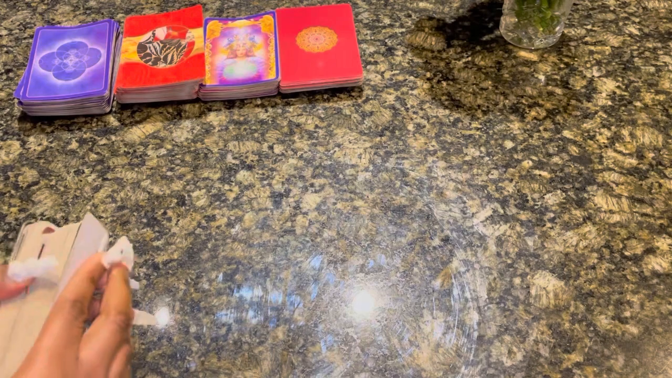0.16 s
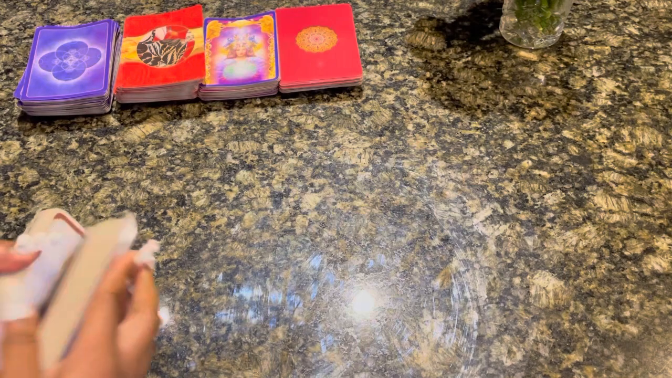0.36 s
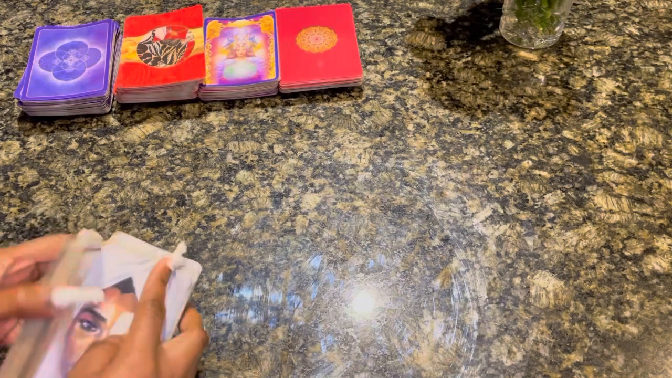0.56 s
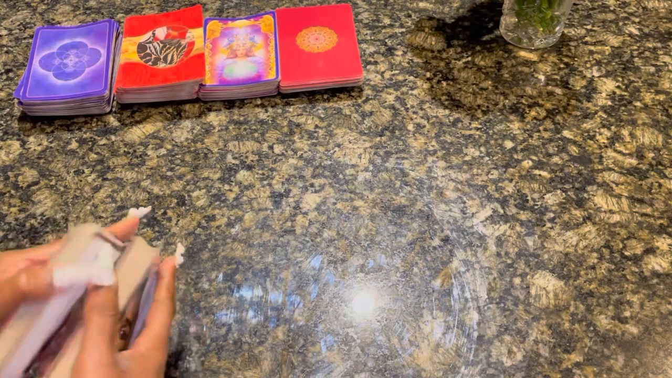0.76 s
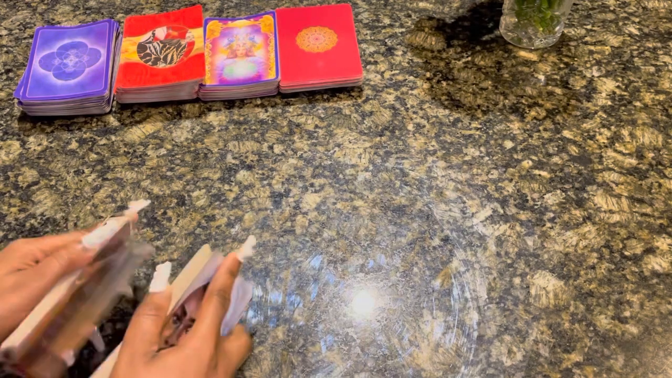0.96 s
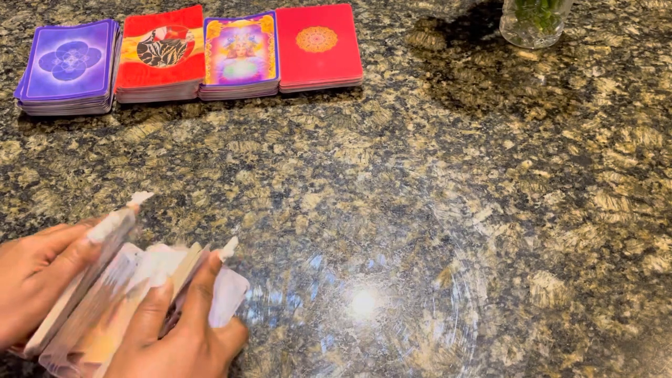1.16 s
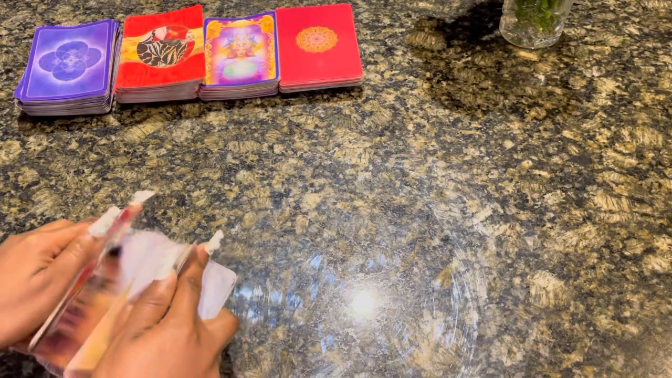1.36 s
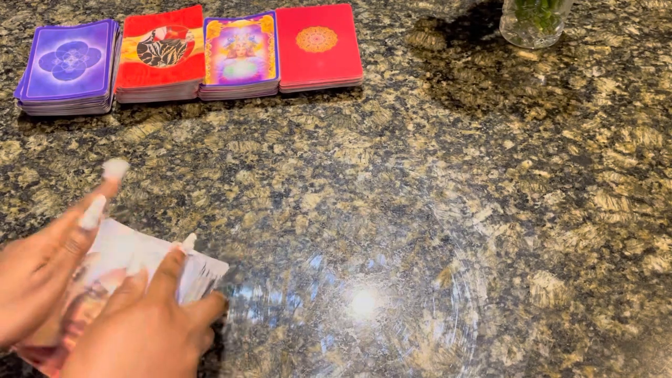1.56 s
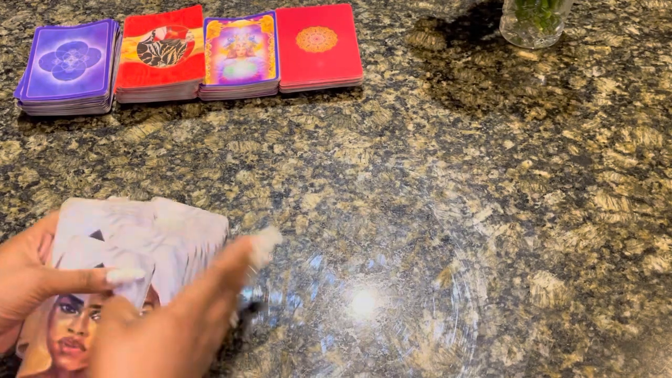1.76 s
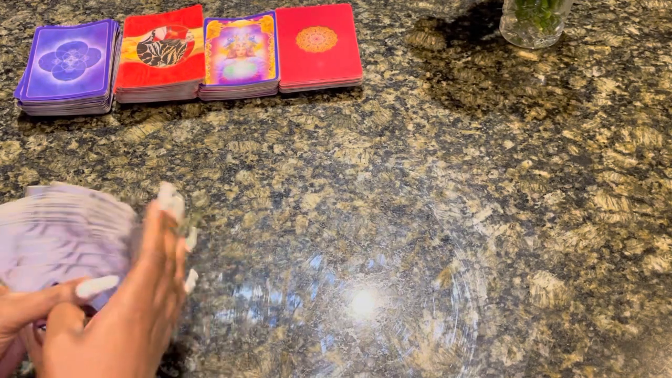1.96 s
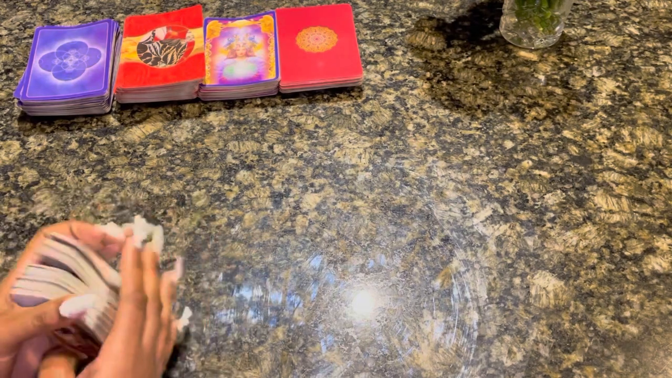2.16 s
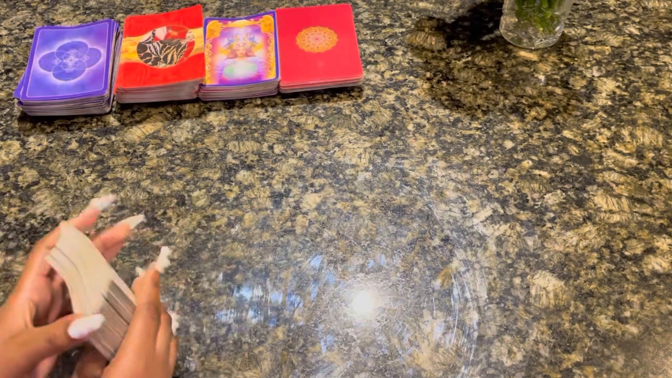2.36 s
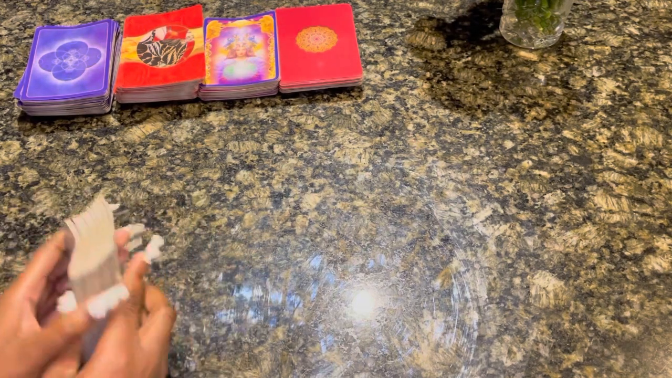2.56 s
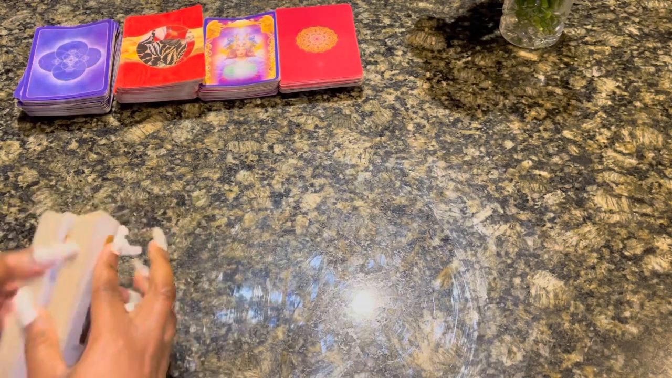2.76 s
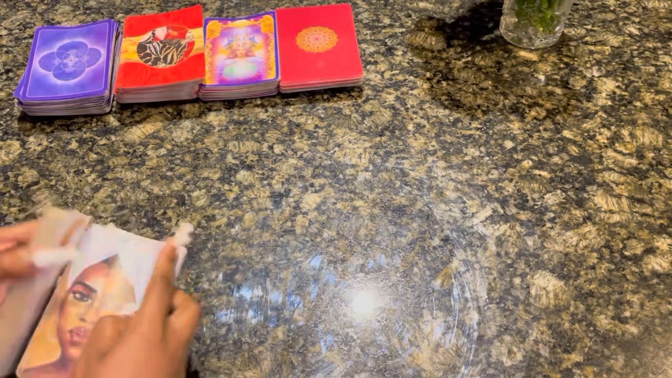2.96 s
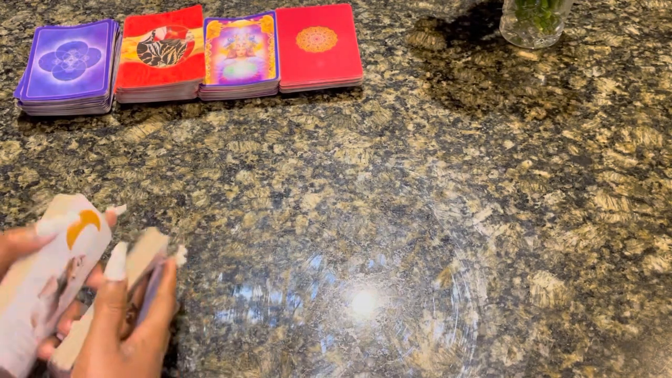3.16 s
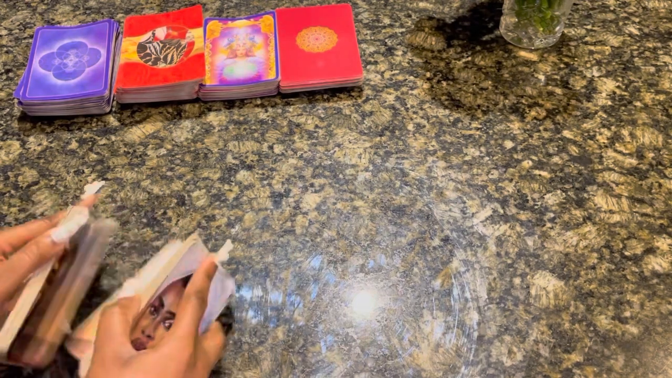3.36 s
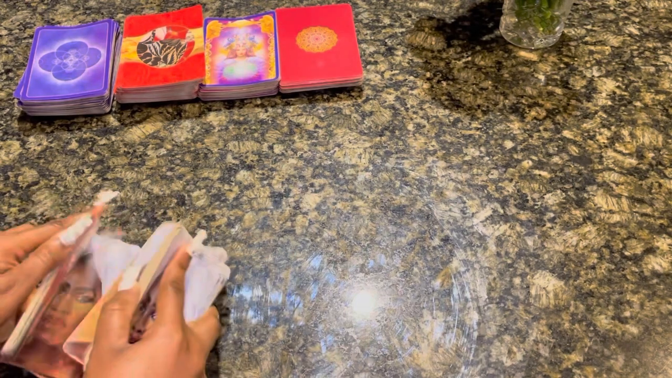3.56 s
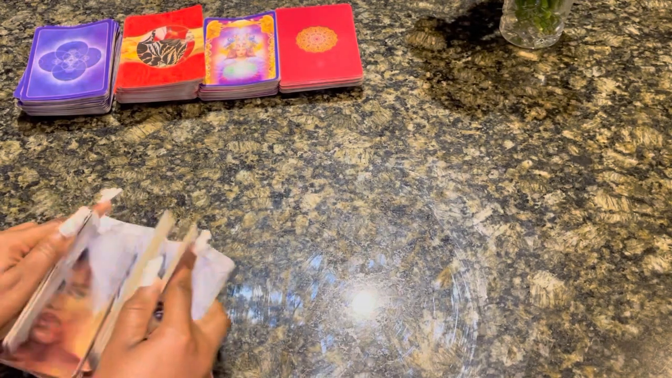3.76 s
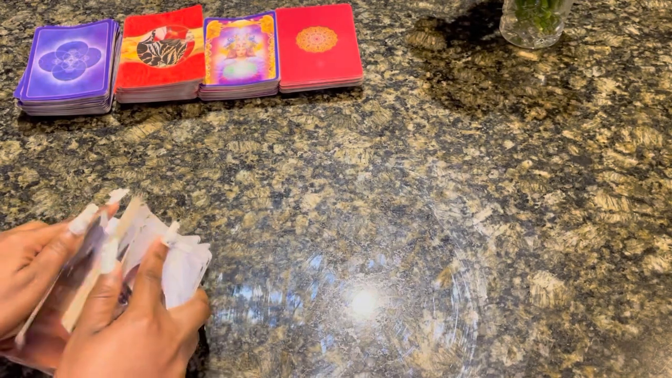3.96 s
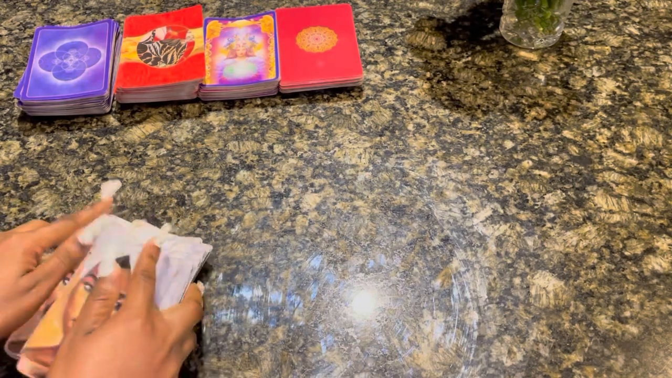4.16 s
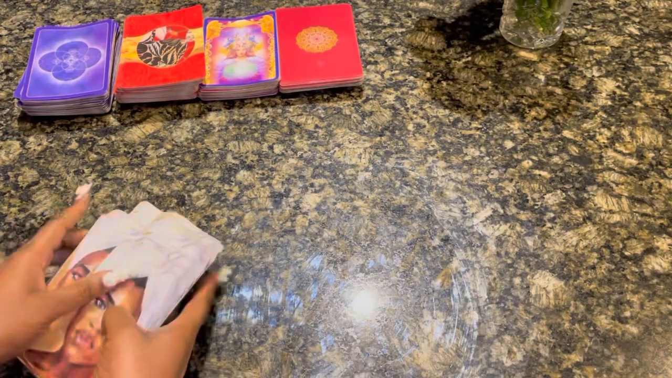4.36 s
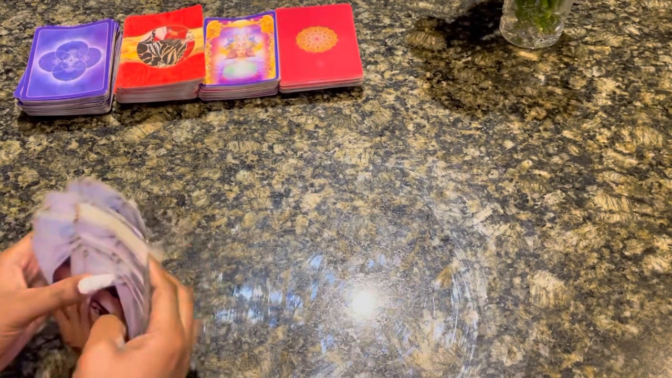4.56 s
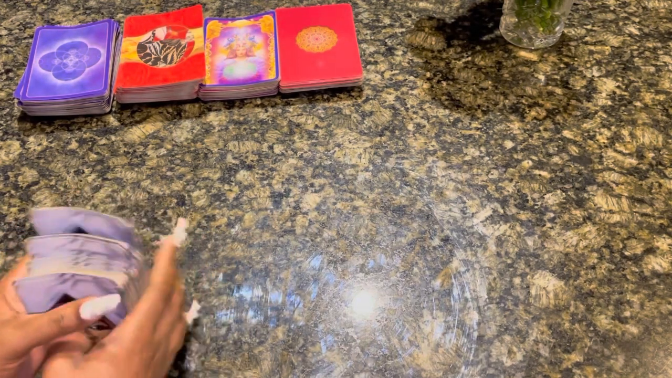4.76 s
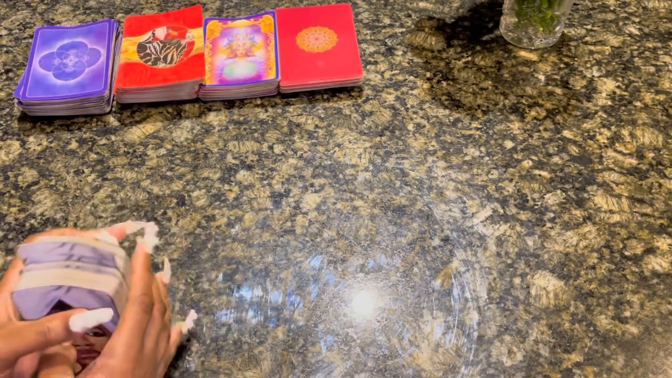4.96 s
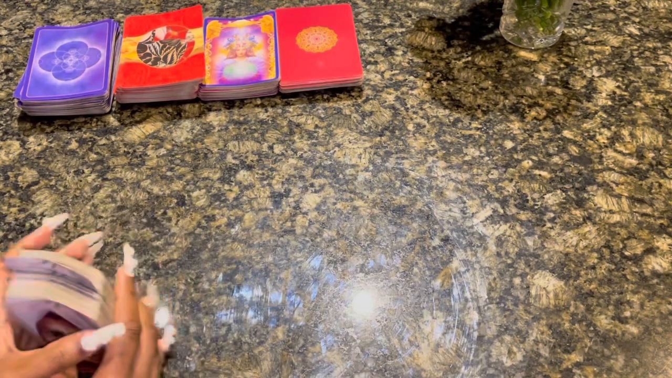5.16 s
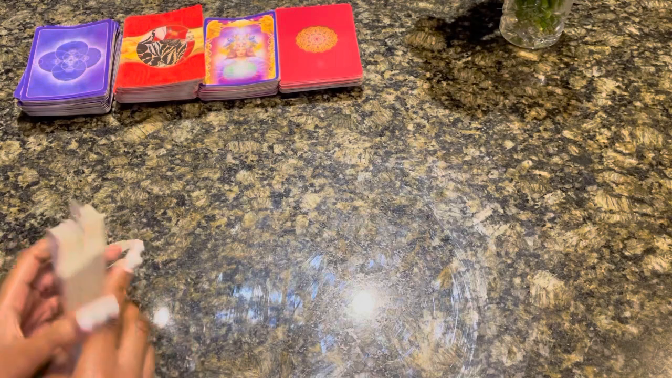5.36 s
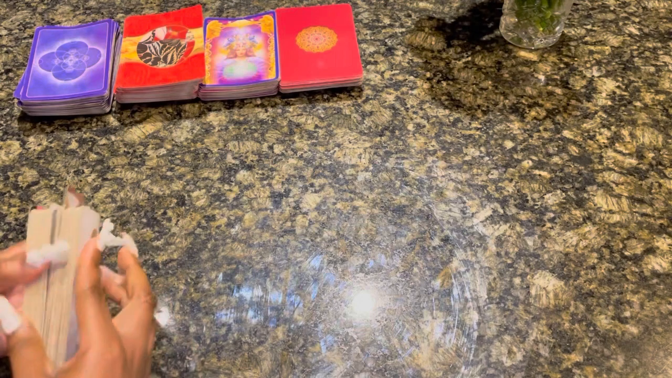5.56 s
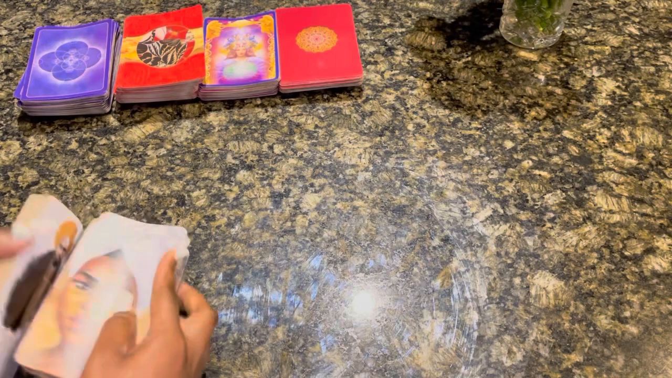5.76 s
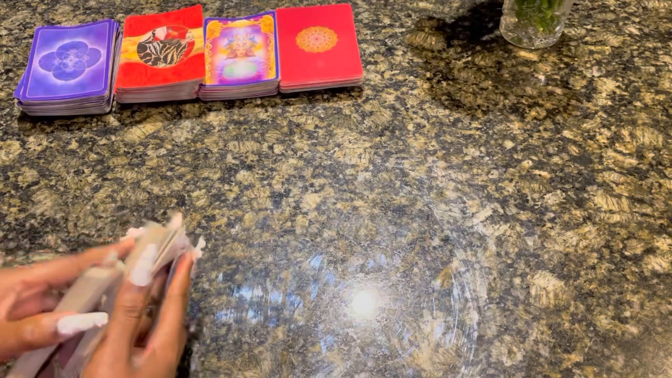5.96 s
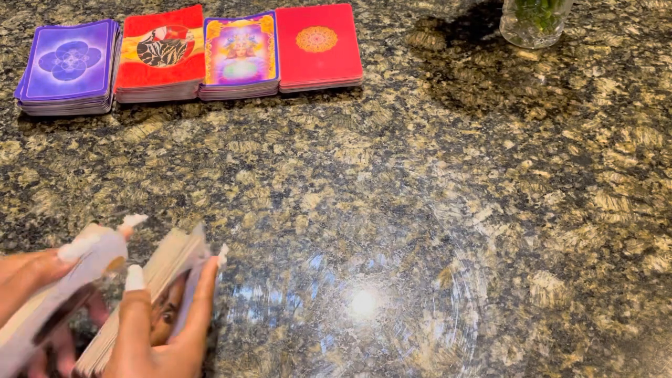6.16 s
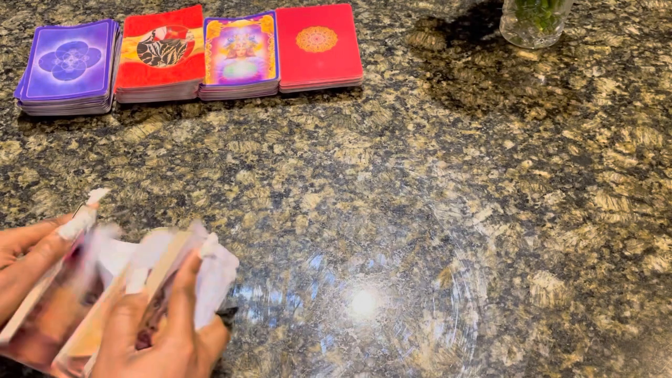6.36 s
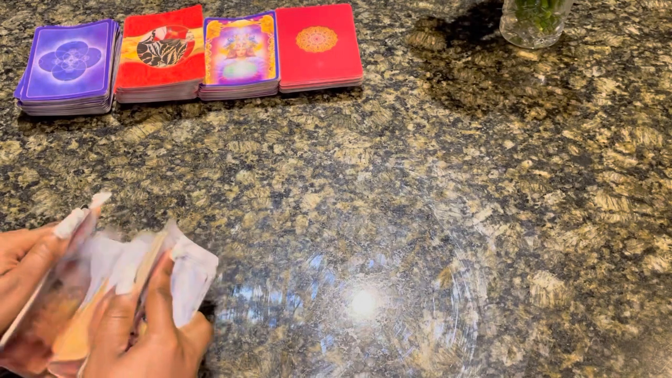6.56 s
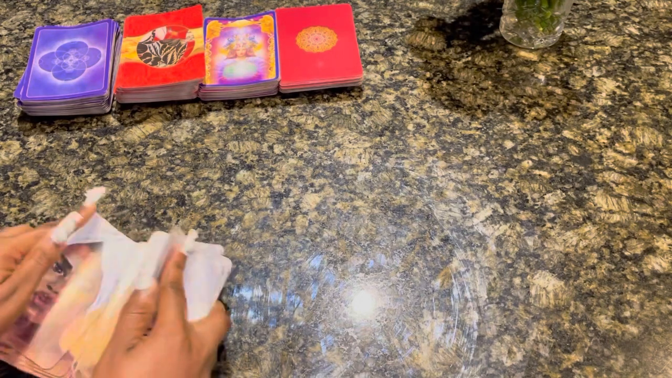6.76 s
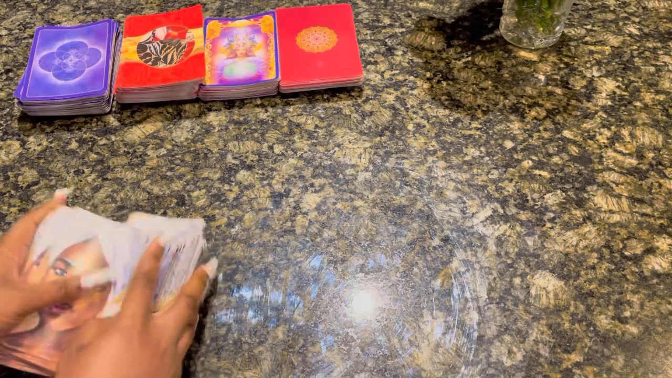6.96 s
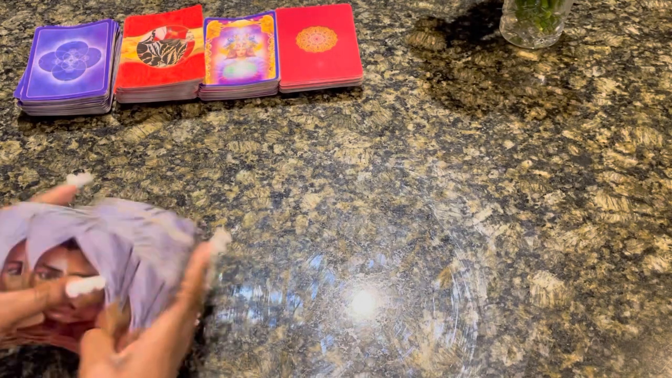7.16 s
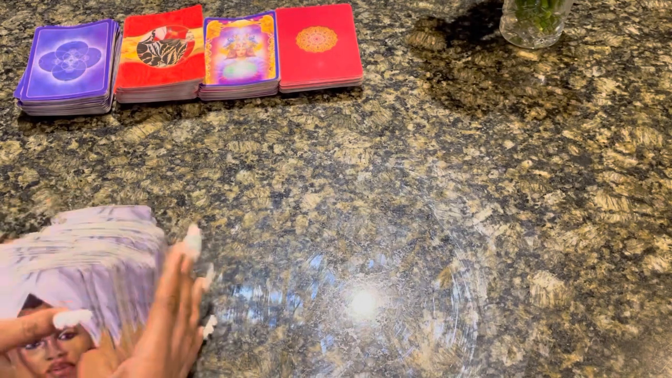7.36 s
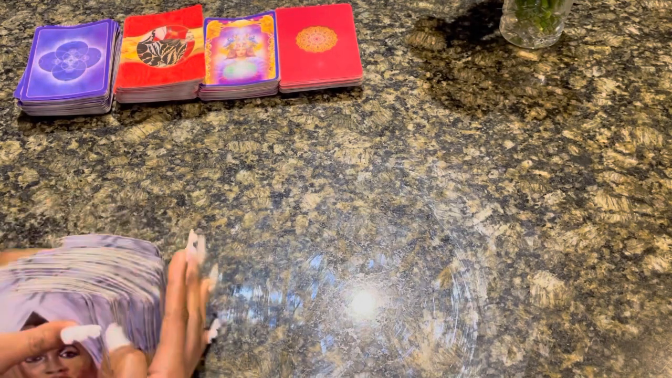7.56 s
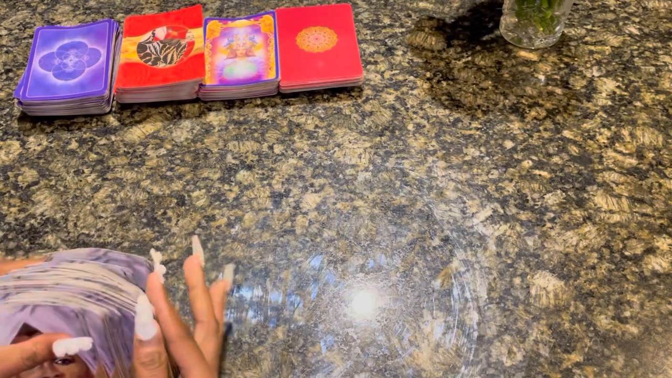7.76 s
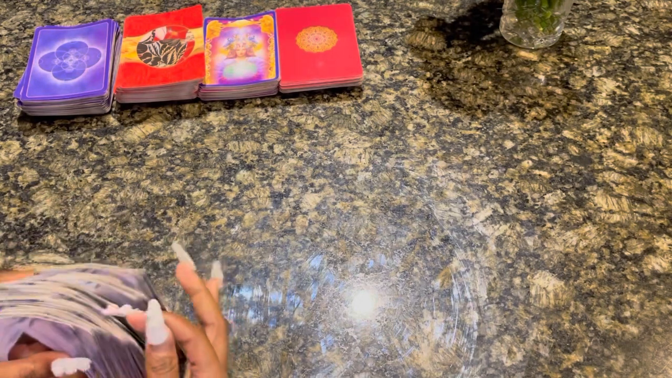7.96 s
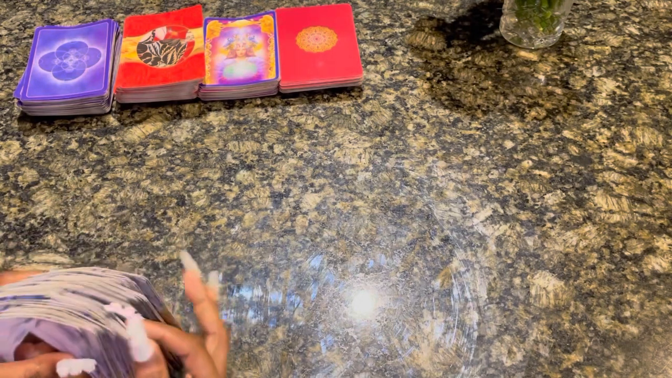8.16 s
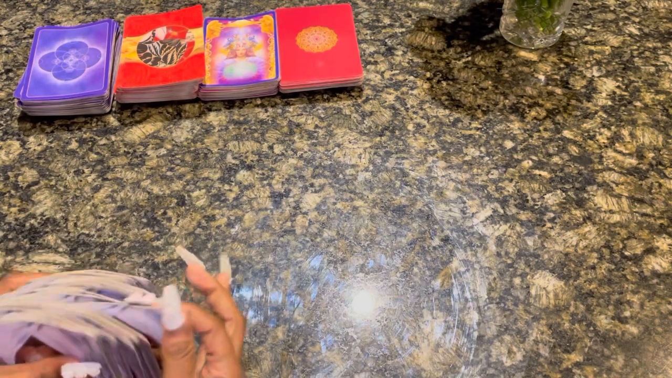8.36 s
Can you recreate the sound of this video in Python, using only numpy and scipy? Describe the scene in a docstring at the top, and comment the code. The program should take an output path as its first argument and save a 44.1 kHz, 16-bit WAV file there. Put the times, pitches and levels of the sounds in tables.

```python
"""Shuffling stiff cards

A deck is shuffled by hand on a stone counter in a bare, echoing room, close to a microphone.
Card edges snap past the thumbs: a burst of noise for the crack, short resonances for the bending card.
Whole packets slap flat, faces rub with ticking noise, and the deck's edge rings as it knocks the stone.
Fingers pat softly. A mains motor hums behind, made of sines, over room air and microphone hiss.
Fading noise makes the echo; the hardest snaps overload the microphone."""
import sys
import numpy as np
from scipy import signal
from scipy.fft import rfft, irfft, next_fast_len
from scipy.io import wavfile
from scipy.ndimage import map_coordinates

SR = 44100
rng = np.random.default_rng(int(sys.argv[2]) if len(sys.argv) > 2 else 0)


def generate_wav(signal):
    """Clip the signal to [-1, 1] and save it as 16-bit WAV at the path in sys.argv[1]."""
    frames = np.transpose(np.atleast_2d(signal))
    scaled = np.clip(frames, -1, 1) * 32767
    pcm = np.round(scaled).astype(np.int16)
    wavfile.write(sys.argv[1], SR, pcm)


N = 370881  # length in samples
LEAD = SR  # samples before time zero, so that earlier sounds still echo

# card edges let go: (t/s, crack peak level/dB, flexing rms level/dB, flexing pitch f/Hz)
EDGE_SNAPS = [(0.4765, -29.5, -40.5, 1570), (0.5075, -18.5, -44, 1400), (0.5417, -27, -49, 2080),
              (0.6559, -28.5, -35.5, 1850), (1.0547, -16.5, -30.5, 1680), (1.0639, -20.5, -27, 1650),
              (1.0941, -10, -35, 1530), (1.1568, -13, -36, 1840), (1.2249, -21.5, -20.5, 1400),
              (1.2467, -16.5, -25.5, 1460), (1.2628, -7, -19.5, 1470), (1.3547, -12.5, -22.5, 1840),
              (1.3675, -9.5, -25, 1430), (1.376, -12.5, -21, 1660), (1.3995, -8.5, -34.5, 1240),
              (1.4512, -8.5, -12.5, 1550), (1.5039, -8, -25.5, 1960), (1.5298, -23, -24, 1900),
              (1.6361, -10, -34, 1780), (1.7268, -7, -36, 1760), (2.0952, -9, -20, 1770),
              (2.1365, -21, -31.5, 1770), (2.9216, -28, -38, 1370), (3.4078, -16.5, -28, 1690),
              (3.488, -22, -38.5, 1670), (3.5213, -20.5, -40, 1610), (3.5447, -20.5, -34.5, 1510),
              (3.6167, -24, -26.5, 1760), (3.6391, -15, -27, 1490), (3.6879, -24, -30.5, 1450),
              (3.9885, -15.5, -36, 1730), (4.3008, -13.5, -31.5, 1250), (4.4149, -22.5, -30.5, 1372),
              (4.557, -25.5, -37.5, 1440), (4.8535, -35, -29, 1858), (4.8903, -32, -29, 1130),
              (4.9006, -36.5, -27, 1780), (5.679, -33, -37.5, 1920), (5.745, -19.5, -51, 1400),
              (5.7662, -21, -40.5, 1280), (5.916, -25, -36.5, 1460), (6.3216, -24, -35, 1290),
              (6.3685, -22.5, -38, 1540), (6.4531, -17, -26.5, 1500), (6.4811, -10.5, -28, 1440),
              (6.542, -16, -28.5, 1360), (6.5463, -11.5, -32.5, 1590), (6.577, -2, -22.5, 1490),
              (6.5847, -7, -25.5, 1460), (6.6071, -12.5, -21, 1690), (6.6743, -13, -24, 1360),
              (6.6891, -9.5, -26, 1590), (6.6954, -11, -32.5, 2000), (6.7103, -15, -21.5, 1640),
              (6.794, -30, -48, 1600), (6.8626, -17, -35.5, 1610), (6.9787, -28, -36.5, 1850),
              (6.998, -20, -38, 1390), (7.2703, -30.5, -42, 1340), (7.2807, -33, -27.5, 1390),
              (7.2985, -27, -29, 1250), (7.3133, -17, -26.5, 1290), (7.3324, -32, -33.5, 1200),
              (8.1703, -42, -39.5, 1180)]
# whole packets slap flat, the first before the start: the same columns, then (lift of the other modes level/dB)
PACKET_SLAPS = [(-.3, 5.8, -15.5, 1480, 6.5), (1.4845, 10.7, -11.5, 1805, -14.5), (4.0477, 12, -7, 1230, 4)]
# modes of one bent card: (multiple of the pitch, width as share of the pitch, level/dB)
CARD_MODES = [(1, 0.37, 11), (1.702, 0.63, 0)]
# modes of a thick packet: (multiple of the pitch, width as share of the pitch, level/dB)
PACKET_MODES = [(.72, 0.28, -7), (1, 0.13, 6), (1.65, 0.61, -4.5), (3.25, 0.061, 0.5), (4.898, 0.18, -15)]
# tone of a crack before thinning: (f/Hz, relative level/dB)
CRACK_TONE = [(1500, -17), (3000, 0), (4000, -2), (6200, 0.5), (7400, -4), (9000, 2), (11300, 0.5),
              (13000, -7), (15500, -39)]
# the deck's edge meets the counter: (t/s, approximate peak level/dB)
DECK_KNOCKS = [(2.095, -8.5), (2.117, -18.5), (2.139, -26), (2.158, -17), (4.648, -23.5), (4.829, -22),
               (4.853, -23.5), (4.890, -20.5), (4.91, -16), (7.298, -27), (7.313, -20.5)]
# modes of the deck on stone: (f/Hz, width f/Hz, relative level/dB)
DECK_MODES = [(420, 79, -4), (600, 16, 3.5), (767, 12, -21.5), (1065, 32, 16), (1700, 60, 10.5),
              (2550, 240, -3.5), (4630, 2800, -4)]
# fingers pat the pack or the stone: (t/s, f/Hz, peak level/dB of the swell)
FINGER_PATS = [(.73, 600, -31.5), (1.009, 231, -37.5), (2.924, 760, -32)]
# faces rub past each other: (middle t/s, nominal length t/s, hiss level/dB, body of the pack level/dB)
RUBBING_STROKES = [(0.505, 0.086, -43, -49), (0.654, 0.084, -44, -46.5), (0.732, 0.09, -48.5, -49),
                   (.88, 0.01, -48.5, -45.5), (1.178, 0.33, -47, -39), (1.27, 0.03, -33.5, -36),
                   (1.384, 0.058, -34, -25.5), (1.924, 0.079, -36.5, -43), (2.128, 0.083, -54, -28.5),
                   (2.883, 0.11, -42.5, -49), (3.107, 0.044, -47, -50), (3.501, 0.2, -47, -45.5),
                   (3.624, 0.089, -36.5, -33), (3.733, 0.081, -35.5, -37), (3.852, 0.083, -50, -44),
                   (4.643, 0.075, -42.5, -36), (4.761, 0.093, -47, -45.5), (4.926, 0.12, -60.5, -47),
                   (5.668, 0.013, -42, -37.5), (5.76, 0.086, -43, -56), (5.84, 0.44, -56.5, -64),
                   (6.201, 0.032, -38, -61), (6.492, 0.3, -42.5, -41), (6.586, 0.072, -36, -31),
                   (6.696, .05, -26, -24.5), (6.835, 0.16, -40.5, -41.5), (7.151, .2, -55, -50.5),
                   (7.316, 0.021, -31.5, -27.5), (8.331, .048, -69, -50)]
# tone of the rubbing edges: (f/Hz, relative level/dB per Hz)
RUB_HISS_TONE = [(2000, -27.5), (4000, -1), (5800, 3), (7400, 1.5), (9500, 9), (11300, 4), (13000, 0),
                 (15500, -10.5)]
# tone of the rubbing pack: (f/Hz, relative level/dB per Hz)
RUB_PACK_TONE = [(300, -7), (700, 4.5), (1500, 2), (2300, 2.5), (3300, -6), (6000, -19)]
# echo of the hard walls: (f/Hz, time to fall 60 dB t/s)
WALL_DECAY = [(300, 2.16), (800, 2.03), (2000, 1.414), (5500, 1.41), (10000, 0.66), (15000, 1.06)]
# motor hum: (f/Hz, average rms level/dB)
MOTOR_HUM = [(120, -51.5), (240, -69.5)]
# tone of room air and microphone hiss: (f/Hz, relative level/dB per Hz)
AIR_TONE = [(20, -7.5), (70, -5.5), (190, -14.5), (240, -12.5), (300, -13.5), (1000, -14.5), (3200, -26),
            (9800, -32), (15500, -29.5)]

CREEP_S, RELEASE_S = .004, .005  # the edge creeps before it lets go; the release then falls 60 dB
CARD_SCUFF_S, PACKET_SCUFF_S = 0.019, 0.013  # 60 dB fall of the scuff after a usual crack
SCUFF_DB_PER_DOUBLING, SCUFF_SCATTER = 10.5, .3  # duller snaps drag on longer; scatter in doublings
FLEX_S = .005  # the flexing level is the rms over this time
USUAL_CRACK_DB = 14  # peak of a usual crack over its flexing
# dB lost per octave under this frequency, per dB that a crack stands above the usual
THINNING, THIN_BELOW_HZ = 0.21, 8000
CONTACT_S = .00005  # rise of the knock's push
# slips of the rubbing faces: rate, least size, average extra size, fade to 1/e
TICKS_PER_S, TICK_DB, TICK_SPREAD_DB, TICK_S = 300, 3, 2.5, .0007
TOP_HZ = 15750  # band limit


def amp(db):
    """Turn a level in dB into a gain."""
    return 10 ** (np.asarray(db) / 20)


def unit(x):
    """Scale x to rms 1."""
    return x / np.sqrt(np.mean(x ** 2) + 1e-20)


def along(points, hz):
    """Read a curve through (Hz, value) points on a log frequency axis."""
    f, value = np.transpose(points)
    return np.interp(np.log(hz + 1), np.log(f + 1), value)


def wobble(rate):
    """Draw a smooth random curve with rate knots a second."""
    knots = rng.standard_normal(int(N * rate / SR) + 4)
    return map_coordinates(knots, [np.arange(N) * rate / SR])


def filtered(x, response):
    """Multiply the spectrum of x by a response, a function of frequency."""
    m = next_fast_len(len(x) + 8192)
    return irfft(rfft(x, m) * response(np.fft.rfftfreq(m, 1 / SR)), m)[:len(x)]


def coloured_noise(rough, tone):
    """Give noise a tone and rms 1; rough is its moment-to-moment strength."""
    noise = rough * rng.standard_normal(N)
    return unit(filtered(noise, lambda hz: amp(along(tone, hz))))


def causal(points):
    """Minimum-phase response through (Hz, dB) points: nothing sounds before the blow."""
    def response(hz):
        cepstrum = irfft(np.log(amp(along(points, hz))))
        # fold the second half onto the first
        cepstrum[1:len(cepstrum) // 2] *= 2
        cepstrum[len(cepstrum) // 2 + 1:] = 0
        return np.exp(rfft(cepstrum))
    return response


def resonance(hz, centre_hz, width_hz):
    """One damped mode, with gain 1 at its centre."""
    return 1j * hz * width_hz / (centre_hz ** 2 - hz ** 2 + 1j * hz * width_hz)


def mode_sum(modes):
    """Add (Hz, width Hz, dB) modes with alternating signs, as one response."""
    def response(hz):
        return sum((-1) ** k * amp(db) * resonance(hz, centre, width)
                   for k, (centre, width, db) in enumerate(modes))
    return response


def snaps(rows, modes, scuff_s, crack_spread):
    """Each edge cracks raggedly and the bent card rings briefly: (near sound, sound sent to the walls)."""
    near, far = np.zeros((2, LEAD + N + SR))
    t = np.arange(SR // 20) / SR
    pulse = 1. * (t == 0)
    after = np.maximum(t - CREEP_S, 0)
    for s, crack_db, flex_db, pitch_hz, *lift_db in rows:
        excess_db = crack_db - flex_db - USUAL_CRACK_DB
        doublings = -excess_db / SCUFF_DB_PER_DOUBLING + SCUFF_SCATTER * rng.standard_normal()
        drag = 2 ** np.clip(doublings, -2, 2)

        thin_db = THINNING * np.clip(excess_db, -8, 20)
        tone = [(f, db + thin_db * min(np.log2(f / THIN_BELOW_HZ), 0)) for f, db in CRACK_TONE]
        edge = filtered(pulse, causal(tone))
        body = mode_sum([(m * pitch_hz, w * pitch_hz, db + sum(lift_db) * (m != 1))
                         for m, w, db in modes])

        release = amp(-60 * after / RELEASE_S)
        scuff = 1.23 * amp(-60 * after / (scuff_s * drag))
        # the scuff stutters about each millisecond
        slips = amp(4 * np.repeat(rng.standard_normal(len(t) // 40 + 1), 40)[:len(t)])
        strength = np.where(t < CREEP_S, 0.021 * t / CREEP_S, release + slips * scuff)
        burst = strength * rng.standard_normal((2, len(t)))

        crack = signal.fftconvolve(burst[0], edge)[:len(t)]
        crack = amp(crack_db) * crack / np.abs(crack).max()
        flex = filtered(burst[1], body)
        flex = amp(flex_db) * flex * np.sqrt(FLEX_S * SR) / np.linalg.norm(flex)

        at = LEAD + round((s - CREEP_S) * SR)
        near[at:at + len(t)] += crack + flex
        let_go = at + round(CREEP_S * SR)
        # the walls hear all directions at once: ripples average out,
        # and the crack beams more narrowly than the flexing
        for sound, even, spread in ((crack, edge, crack_spread), (flex, filtered(pulse, body), 1)):
            far[let_go:][:len(t)] += spread * np.linalg.norm(sound) * even / np.linalg.norm(even)
    return near[:LEAD + N], far[:LEAD + N]


def slide():
    """Rubbing faces stick and slip: tiny ticks on a fluttering hiss, heard in the edges and in the pack."""
    t = np.arange(N) / SR
    # each stroke swells and fades over 1.32 times its nominal length
    swell = np.array([np.cos(np.pi * np.clip((t - s) / (1.32 * length), -.5, .5)) ** 2
                      for s, length, _, _ in RUBBING_STROKES])
    hiss_gain, pack_gain = amp(np.array(RUBBING_STROKES)[:, 2:]).T @ swell

    tick_sizes = amp(TICK_DB + TICK_SPREAD_DB * rng.exponential(size=N))
    ticks = (rng.random(N) < TICKS_PER_S / SR) * tick_sizes
    fading_ticks = signal.lfilter([1], [1, -np.exp(-1 / (TICK_S * SR))], ticks)
    rough = (1 + fading_ticks) * amp(3.9 * wobble(70))

    hiss = coloured_noise(rough, RUB_HISS_TONE)
    pack = coloured_noise(rough, RUB_PACK_TONE)
    fidget = amp(-62.0 + 1.9 * wobble(7.7))  # the hands are never quite still
    return np.pad((hiss_gain + fidget) * hiss + pack_gain * pack, (LEAD, 0))


def knocks():
    """A blunt push of under a millisecond rings the deck and the slab under it."""
    blows = np.zeros(LEAD + N)
    u = np.arange(SR // 50) / SR / CONTACT_S
    push = u * np.exp(-u)
    for s, db in DECK_KNOCKS:
        ragged_push = push * (1 + 0.15 * rng.standard_normal(len(u)))
        blows[LEAD + round(s * SR):][:len(u)] += amp(db) * ragged_push
    deck = mode_sum(DECK_MODES)
    return filtered(blows, deck) / np.abs(filtered(push, deck)).max()


def thuds():
    """Soft finger pats: a few low cycles that swell and die."""
    out = np.zeros(LEAD + N)
    t = np.arange(SR // 10) / SR
    for s, hz, db in FINGER_PATS:
        u = t * hz / 0.78  # the swell peaks after 0.78 of a cycle
        swell = np.e * u * np.exp(-u)
        out[LEAD + round(s * SR):][:len(t)] += amp(db) * swell * np.sin(2 * np.pi * hz * t)
    return out


def room(x):
    """Hard walls: each frequency dies at its own speed; the hands move, so the echo pattern keeps changing."""
    out = np.zeros(len(x) + 4 * SR)
    step, length = SR // 4, 2 * SR
    tails = []
    for _ in range(6):
        hz, t, z = signal.stft(rng.standard_normal(length), SR, nperseg=256)
        swell = 1 - np.exp(-t / .008)  # the first walls are a few metres off
        decay = amp(-60 * t / along(WALL_DECAY, hz)[:, None])
        tail = signal.istft(z * swell * decay, SR, nperseg=256)[1][:length]
        tails.append(tail / np.linalg.norm(tail))
    # each quarter second of sound takes the next tail in turn
    for k, at in enumerate(range(0, len(x), step)):
        wet = signal.fftconvolve(x[at:at + step], tails[k % len(tails)])
        out[at:at + len(wet)] += wet
    return out[:len(x)]


def background():
    """A motor hum, slightly unsteady in pitch and level, over room air and microphone hiss."""
    turn = 2 * np.pi * np.arange(N) / SR + 0.0055 * wobble(4.4)
    hum = sum(np.sqrt(2) * amp(db + 0.75 * wobble(12)) * np.sin(hz * turn) for hz, db in MOTOR_HUM)
    return hum + amp(-54.0) * coloured_noise(1, AIR_TONE)


def scene():
    """Mix the cards near the microphone, their echo, and the room's own noise."""
    edges, edges_far = snaps(EDGE_SNAPS, CARD_MODES, CARD_SCUFF_S, crack_spread=0.72)
    slaps, slaps_far = snaps(PACKET_SLAPS, PACKET_MODES, PACKET_SCUFF_S, crack_spread=0.58)
    faces = slide()
    deck = knocks() + thuds()
    echo = room(amp(-5.5) * edges_far + amp(-8) * slaps_far + amp(-8.5) * deck + amp(-7.0) * faces)
    cards = (edges + slaps + deck + faces + echo)[LEAD:]
    return (cards + background())[None]


def record(dry):
    """The input clips smoothly towards full scale; nothing is kept above the band limit."""
    clipped = dry[0] / (1 + np.abs(dry[0]) ** 8) ** (1 / 8)
    return filtered(clipped, lambda hz: hz < TOP_HZ)[None]


dry = scene()
out = record(dry)
generate_wav(out)
```